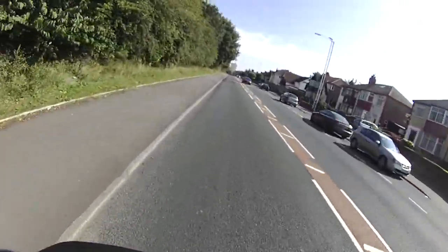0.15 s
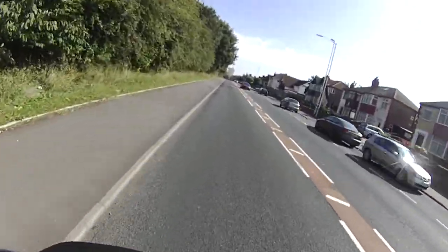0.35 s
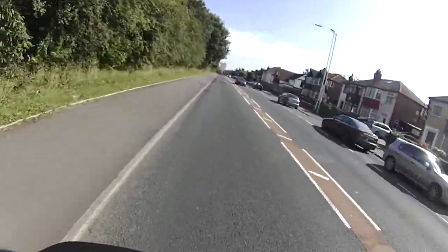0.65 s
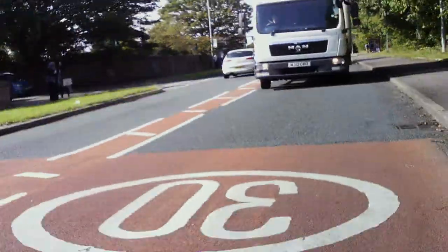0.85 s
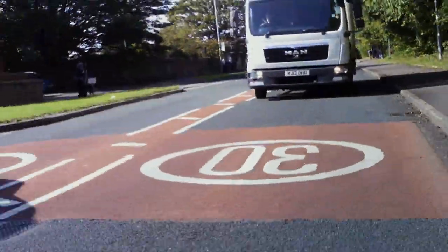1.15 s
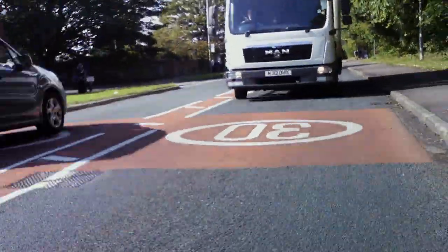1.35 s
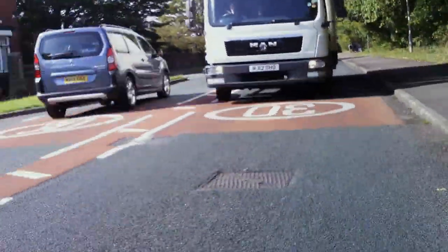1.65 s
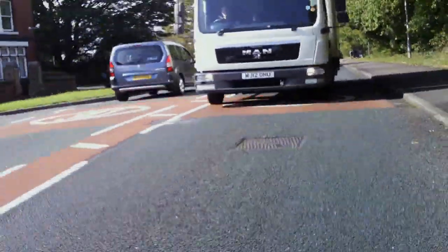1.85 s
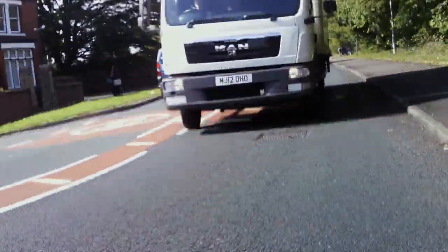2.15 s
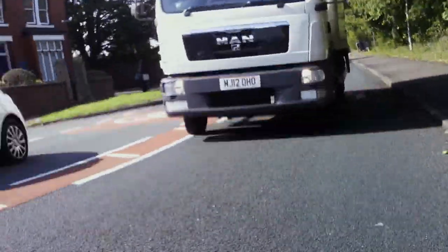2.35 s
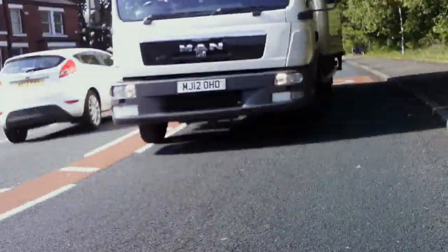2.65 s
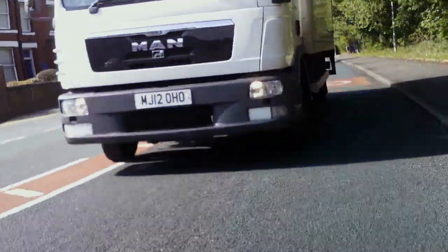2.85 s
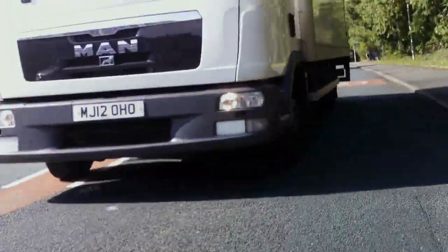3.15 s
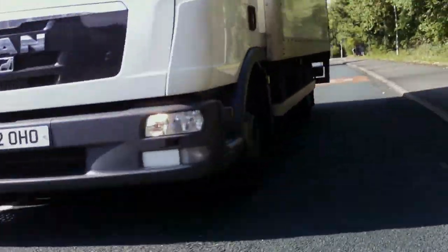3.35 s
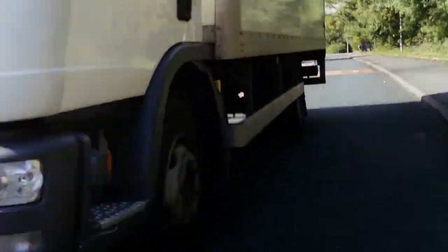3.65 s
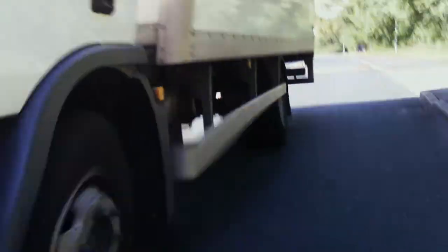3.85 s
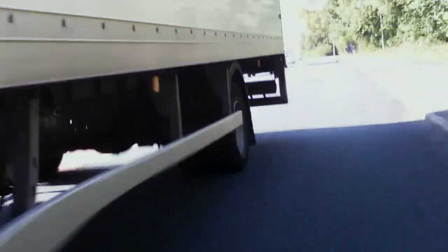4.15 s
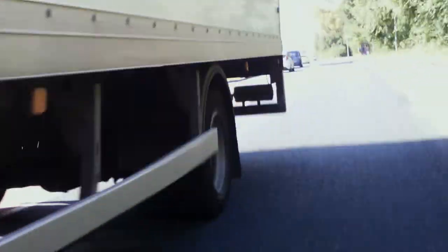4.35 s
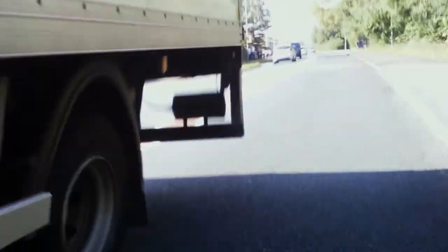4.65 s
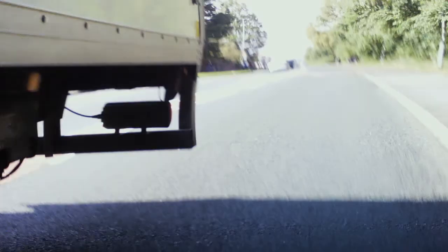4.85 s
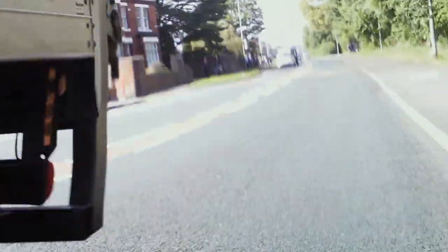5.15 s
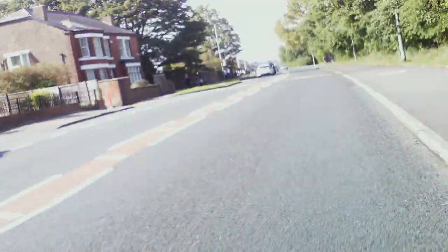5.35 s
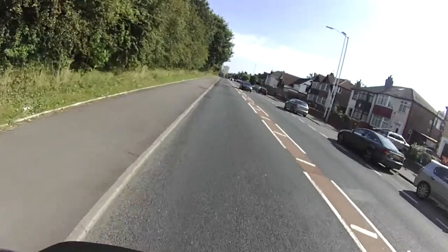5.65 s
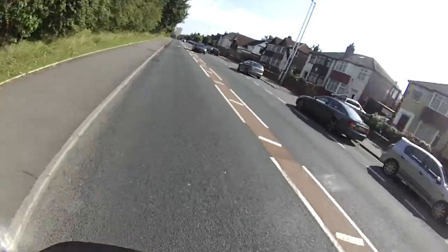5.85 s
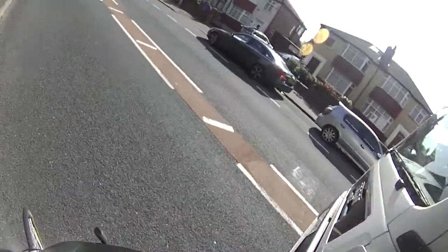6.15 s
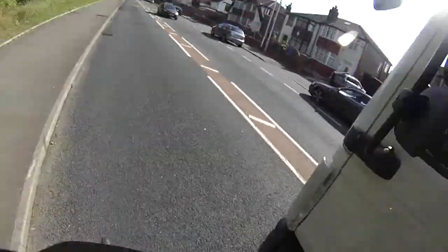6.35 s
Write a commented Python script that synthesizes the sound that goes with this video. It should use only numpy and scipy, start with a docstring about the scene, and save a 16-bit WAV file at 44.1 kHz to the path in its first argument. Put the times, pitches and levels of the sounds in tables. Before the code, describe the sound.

Outdoor road sound, the same in both channels. It opens with a faint even rush and low hum, then jumps to heavy wind overloading a close microphone, gusting and knocking, with dry rattles. As a truck passes very near, a brief diesel growl swells, cracks multiply and a bright hiss climbs. A harsh high air horn blasts twice with almost no gap, stops abruptly, and gentle road rush grows at the end.

```python
"""Even road rush over a low engine drone at a cyclist's helmet, then gusty wind overloading a rear camera.
A box truck overtakes behind the cyclist with a growl and a rising hiss amid sharp cracks and rattles, and a
shrill air horn blasts twice before the helmet view returns. Shaped noise makes wind, tyres and hiss; damped
modes make low thumps and ticks; summed harmonics make the horn, and a soft ceiling overloads the rear input."""
import sys
import numpy as np
from scipy import signal
from scipy.fft import rfft, irfft, next_fast_len
from scipy.io import wavfile
from scipy.ndimage import uniform_filter1d, map_coordinates

SR = 44100
rng = np.random.default_rng(int(sys.argv[2]) if len(sys.argv) > 2 else 0)


def to_wav(s):
    """Save 16-bit WAV."""
    ch = np.atleast_2d(s).T  # columns
    pcm = np.round(np.clip(ch, -1, 1) * 32767)  # PCM
    wavfile.write(sys.argv[1], SR, pcm.astype(np.int16))


N = 286209
TIME = np.arange(N) / SR  # seconds


def amp(db):
    """Logarithmic level: decibels to an amplitude ratio."""
    return 10 ** (np.asarray(db) / 20)


def unit(x):
    """Normalisation by mean power: scale to rms 1."""
    return x / np.sqrt(np.mean(x ** 2) + 1e-20)


def curves(rows):
    """Linear interpolation: one value per sample for each column after the time."""
    knot_s, *columns = np.transpose(rows)
    return [np.interp(TIME, knot_s, column) for column in columns]


def wobble(rate):
    """Band-limited random modulation: a smooth curve through `rate` random knots per second."""
    knots = rng.standard_normal(int(N * rate / SR) + 4)
    return map_coordinates(knots, [TIME * rate])


def swells(rows):
    """Gaussian envelopes: bell-shaped swells from (centre_s, half_width_s, height) rows."""
    return sum(height * np.exp(-((TIME - s) / width) ** 2) for s, width, height in rows)


def level_swells(rows):
    """Gaussian envelopes whose heights are given in decibels."""
    return swells([(s, width, amp(db)) for s, width, db in rows])


def between(start, end):
    """Gating: 1 from start to end, with millisecond edges."""
    return np.clip(np.minimum(TIME - start, end - TIME) * 1000, 0, 1)


def filtered(x, response):
    """Linear filtering: multiply the spectrum by a response of frequency."""
    m = next_fast_len(N + 8192)
    return irfft(rfft(x, m) * response(np.fft.rfftfreq(m, 1 / SR)), m)[..., :N]


def noise(spectrum):
    """Spectral shaping: random noise of rms 1 coloured by (frequency_hz, density_db) points."""
    f, db = np.transpose(spectrum)

    def colour(hz):
        return amp(np.interp(np.log(hz + 1), np.log(f), db))

    return unit(filtered(rng.standard_normal(N), colour))


def steady(x, seconds):
    """Envelope normalisation: divide out the slow swells of a sound."""
    window = signal.windows.hann(int(seconds * SR) + 3)
    power = signal.fftconvolve(x ** 2, window / window.sum(), "same")
    return x / np.sqrt(np.abs(power) + 1e-6)


def patchy(x, depth_db):
    """Independent band modulation: neighbouring bands of a noise swell and fade on their own."""
    z = signal.stft(x, nperseg=512)[2]
    across_bands = uniform_filter1d(rng.standard_normal(z.shape), size=9, axis=0)
    field = uniform_filter1d(across_bands, size=30, axis=1)
    return unit(signal.istft(z * amp(depth_db * unit(field)), nperseg=512)[1][:N])


def ring(modes, age, rise_s):
    """Modal decay: damped (frequency_hz, level_db, t60_s) modes after an impulse with a rounded start."""
    tones = sum(amp(db - 60 * age / t60) * np.sin(2 * np.pi * hz * age) for hz, db, t60 in modes)
    return tones * (1 - np.exp(-(age / rise_s) ** 2))


def self_noise():
    """Electronic noise floor: a faint, stationary coloured hiss."""
    return amp(-67.5) * noise([(1000, 9.5), (3000, 5.5), (7000, 0.0), (10000, 4.0), (15500, -14)])


# spectra of the low roar and of the tyre and air rush: frequency_hz, density_db (relative)
ROAR_SPECTRUM = [(20, -16), (45, -7), (100, -5), (170, -4), (300, 0), (450, -7.5), (700, -10), (1100, -9.5),
                 (2500, -55)]
TYRE_SPECTRUM = [(300, 1.5), (750, 2), (1100, 0), (1800, 2.5), (2350, -2.5), (2800, -9), (3300, -24.5),
                 (4900, -27), (5750, -21.5), (6700, -32.5), (10000, -39.5), (14000, -42), (15500, -76)]
# engine harmonics: order, level_db (before the engine gain)
DRONE_HARMONICS = [(1, -58.5), (2, -57), (3, -63.5), (4, -61)]
# engine loudness: time_s, gain_db
ENGINE_GAIN = [(0, -1.5), (0.78, 2.5), (6.2, 1.5), (6.49, 1.5)]
# road rush before and after the rear view: time_s, roar_db, rush_db (before the trims)
ROAD_BEFORE = [(0.02, -41.5, -47), (0.21, -48.5, -49.5), (0.36, -44.5, -47), (0.43, -42, -45.5),
               (0.6, -49, -45), (0.75, -65, -45)]
ROAD_AFTER = [(5.54, -52, -45.5), (5.7, -54, -46.5), (5.85, -52, -47), (6.02, -48, -48.5),
              (6.16, -45, -45), (6.24, -60, -43), (6.42, -38.5, -40.5), (6.48, -42.5, -44)]
DRONE_HZ = 35.7  # mean pitch of the first order


def road(roar_gain_db=-1, rush_gain_db=0.86):
    """Broadband tyre and flow noise rushes past the helmet over the harmonic drone of an engine."""
    roar_db, rush_db = curves(np.vstack([ROAD_BEFORE, ROAD_AFTER]))
    engine_db, = curves(ENGINE_GAIN)
    roar = amp(roar_db + roar_gain_db + 0.29 * wobble(33)) * noise(ROAR_SPECTRUM)
    rush_level = amp(rush_db + rush_gain_db + 0.81 * wobble(30))
    rush = rush_level * patchy(noise(TYRE_SPECTRUM), depth_db=1.47)
    turn = 2 * np.pi * np.cumsum(DRONE_HZ * (1 + 0.014 * wobble(3.3))) / SR
    drone = np.zeros(N)
    for order, (_, db) in enumerate(DRONE_HARMONICS, 1):
        drone += amp(db + 2.3 * wobble(3.18)) * np.sqrt(2) * np.sin(order * turn)
    return roar + rush + amp(engine_db) * drone


# the truck's hiss reaching the helmet: centre_s, half_width_s, level_db
NEARING_SWELLS = [(6.26, 0.05, -80), (6.41, 0.055, -65.5)]


def nearing():
    """Addition of noise bands: the truck brightens the road rush as it comes up beside the helmet."""
    hiss = noise([(1500, -10), (3500, 3), (5000, -6.5), (7500, -4), (10000, -26), (15000, -28)])
    return level_swells(NEARING_SWELLS) * hiss


# steady strength of the wind at the rear microphone: time_s, level_db (before unrest and trims)
WIND_LEVEL = [(0.8, -31.5), (1.1, -28.5), (1.6, -29.5), (1.95, -26.5), (2.75, -28), (3.3, -28.5),
              (3.5, -31.5), (3.9, -29), (4.1, -28.5), (5.47, -26)]
# gusts and lulls: centre_s, half_width_s, change_db
GUST_SWELLS = [(0.87, 0.013, 1.5), (0.995, 0.031, 10), (1.125, 0.024, -4), (1.354, 0.017, 6),
               (1.64, 0.016, -7), (1.82, 0.043, 3.5), (1.915, 0.016, -2), (2.1, 0.021, 5), (2.36, 0.012, 5),
               (2.53, 0.029, 3), (2.735, 0.017, 2.5), (2.806, 0.032, 7.5), (2.945, 0.0051, -18),
               (3.036, 0.015, 4.5), (3.105, 0.024, -3.5), (3.225, 0.033, 4.5), (4.47, 0.018, 6.5),
               (4.75, 0.035, 6.5), (4.83, 0.019, -2), (4.895, 0.021, 10), (4.98, 0.011, 9.5),
               (5.035, 0.026, 13), (5.12, 0.04, 0), (5.262, 0.03, 13)]
# spectra of the buffeting, the slipstream and the deepest buffeting: frequency_hz, density_db (relative)
BUFFET_SPECTRUM = [(45, -23), (62, -14), (92, -2.5), (118, -9), (142, -2), (164, -2), (194, -2.5),
                   (222, -12.5), (380, -18), (640, -30), (1000, -44.5), (2000, -62), (4000, -87)]
SLIPSTREAM_SPECTRUM = [(120, -3), (280, 2), (390, 1), (520, -7), (635, -1), (700, -9), (770, -7.5),
                       (1000, -30), (1550, -26), (2100, -40), (4000, -42.5)]
SUB_SPECTRUM = [(12, -23), (22, -18), (31, -3.5), (40, -13), (62, -31), (120, -49.5), (400, -100)]
# deepest buffeting: time_s, level_db
SUB_LEVEL_DB = [(0.8, -35.5), (1.0, -25), (1.12, -37.5), (1.42, -28.5), (1.53, -45.5), (1.8, -27.5),
                (2.25, -29.5), (2.6, -27.5), (2.82, -20.5), (2.94, -40), (3.23, -24), (3.45, -37.5),
                (3.68, -40), (3.9, -34), (4.12, -29), (4.8, -31.5), (4.92, -20), (5.47, -30.5)]
UNREST_DB, UNREST_RATE = 1.46, 23  # random swings of the wind (dB, knots per second)


def wind(slip_db=-40.5, follow=0.56, flutter_db=2, roar_grows=0.8, buffet_db=-2):
    """Turbulent pressure: eddies buffet the housing under a more even slipstream roar; gusts lift both."""
    wind_db = curves(WIND_LEVEL)[0] + UNREST_DB * wobble(UNREST_RATE)
    gust_db = swells(GUST_SWELLS)
    buffets = amp(wind_db + gust_db + buffet_db) * steady(noise(BUFFET_SPECTRUM), seconds=0.11)
    # the roar follows the wind by fewer decibels than the buffets do
    roar_db = slip_db + follow * (wind_db - np.mean(wind_db)) + roar_grows * gust_db
    roar = amp(roar_db + flutter_db * wobble(90)) * noise(SLIPSTREAM_SPECTRUM)
    sub = amp(curves(SUB_LEVEL_DB)[0]) * steady(noise(SUB_SPECTRUM), seconds=0.19)
    return buffets + roar + sub


# drone of air around the rear camera: time_s, pitch_hz, level_db (before trim and swing)
HOLLOW_DRONE = [(0.85, 181.1, -30.5), (1.05, 165.3, -37.5), (1.25, 180.3, -33), (1.36, 157.4, -30.5),
                (1.55, 174.3, -33.5), (1.64, 152, -42), (1.78, 180.1, -30), (1.92, 165, -42),
                (2.04, 141.7, -31), (2.28, 182, -32.5), (2.36, 147.6, -26.5), (2.52, 190.1, -34),
                (2.82, 156.3, -27), (2.93, 179.6, -31), (3.1, 170, -37.5), (3.24, 147.9, -33.5),
                (3.34, 172, -24.5), (3.45, 165.3, -42), (3.6, 168.2, -35.5), (3.8, 168, -30.5),
                (3.9, 181.9, -37.5), (4.07, 168, -28.5), (4.25, 165, -45), (4.47, 155.5, -31),
                (4.6, 174.6, -36.5), (5.47, 160, -34.5)]


def hollow(gain_db=-1):
    """Flow-excited tone: air around the housing drones unsteadily, its pitch wandering with time."""
    pitch_hz, level_db = curves(HOLLOW_DRONE)
    turn = 2 * np.pi * np.cumsum(pitch_hz) / SR + .55 * wobble(55)
    swing_db = 3.2 * wobble(40)
    return amp(level_db + gain_db + swing_db) * np.sqrt(2) * np.sin(turn)


# sharp steps: start_s, step_height (full scale 1, before overload)
CLICK_STEPS = [(0.786, -0.035), (0.796, -0.08)]


def clicks(relax=0.003):
    """Exponential relaxation: two sharp steps decay at once (time constant in s)."""
    return sum(height * (TIME >= s) * np.exp(-np.abs(TIME - s) / relax) for s, height in CLICK_STEPS)


# faint, brief bands of high hiss: centre_s, half_width_s, level_db
HIGH_HISS_SWELLS = [(2.63, 0.029, -64), (2.796, 0.0028, -45.5), (3.295, .01, -61)]


def high_hiss():
    """Band-limited noise under Gaussian envelopes: faint, brief bands of high hiss."""
    band = noise([(5000, -40), (8500, -9), (9800, -4), (10800, -11), (14000, -16), (16000, -30)])
    return level_swells(HIGH_HISS_SWELLS) * band


# sharp low thumps, mostly within wind gusts: start_s, strength_db (before the modes ring)
LOW_THUMPS = [(0.947, -3.5), (0.96, 3), (0.977, 2.5), (0.992, 3.5), (1.004, 4), (1.010, 8), (1.024, -12.5),
              (1.349, -14), (2.729, -11), (2.745, -10), (2.776, -10), (2.790, -3), (2.797, 1),
              (2.806, -4.5), (2.823, -2), (3.249, -12), (5.016, 2), (5.035, -4), (5.043, -2), (5.050, 0),
              (5.252, -1), (5.266, -7), (5.287, -3)]
# modes of a thump: frequency_hz, level_db (relative), t60_s
THUMP_MODES = [(152.5, -0.5, 0.015), (356, 1.5, 0.01), (559, -9.5, 0.0057)]
THUMP_RISE_S = 0.0012  # rounds the start of a thump


def low_thumps():
    """Impulse response: each sharp low thump rings briefly in damped modes."""
    impulses = np.zeros(N)
    for s, db in LOW_THUMPS:
        impulses[round(s * SR)] = amp(db)
    return signal.fftconvolve(impulses, ring(THUMP_MODES, TIME[:SR // 8], THUMP_RISE_S))[:N]


# sharp cracks and rattles: start_s, strength_db (before the ticks and the clatter are shaped)
CRACK_IMPULSES = [(0.949, -32), (0.962, -34), (0.979, -28), (0.992, -24), (0.995, -32), (1.0, -33),
                  (1.005, -25), (1.008, -32), (1.01, -28), (1.337, -36), (1.351, -30), (1.358, -37),
                  (1.956, -28), (1.970, -34), (2.011, -34.5), (2.067, -35), (2.100, -32), (2.107, -29.5),
                  (2.178, -32), (2.341, -34), (2.358, -39), (2.484, -38), (2.513, -32), (2.730, -33),
                  (2.745, -31), (2.776, -39), (2.791, -40), (2.798, -33), (2.807, -41), (2.822, -44),
                  (2.878, -34), (3.032, -36), (3.165, -35), (3.234, -35), (3.250, -29), (3.668, -39),
                  (3.938, -26), (4.047, -25.5), (4.068, -22), (4.133, -36), (4.185, -32), (4.202, -28),
                  (4.214, -36), (4.260, -33), (4.286, -30), (4.323, -23), (4.331, -29), (4.440, -21),
                  (4.479, -32), (4.509, -23), (4.562, -31), (4.595, -25), (4.659, -22)]
# spectrum of the short clatter: frequency_hz, density_db (relative)
RATTLE_SPECTRUM = [(300, -4), (700, 7.5), (1200, 6.5), (1900, -11.5), (2700, -10), (4000, -22), (8000, -29),
                   (15000, -37.5)]
# modes of the dry tick: frequency_hz, level_db (relative), t60_s
TICK_MODES = [(830, 2.5, 0.0083), (1500, 0, 0.0043), (2600, -5.5, 0.0032), (4300, -10.5, 0.0022)]
CHATTER_RATE = 130  # mean number of small random ticks per second
CHATTER_DB, CHATTER_SPREAD_DB = -46.5, 6  # their usual strength and the scale of its scatter
CHATTER_FOLLOW = 0.65  # dB of chatter per dB of wind: both grow with speed
TICK_RISE_S = 0.00033  # a tick builds up almost at once


def rattles(decay=0.012, rise=0.00066, shake_db=-16, crack_db=-2, flutter_db=4.5, scatter=0.12):
    """Impulse excitation: set and random impulses each give a dry modal tick and a short, uneven clatter."""
    wind_db, = curves(WIND_LEVEL)
    chatter_db = CHATTER_DB + CHATTER_FOLLOW * (wind_db - np.mean(wind_db))
    strength = amp(chatter_db + CHATTER_SPREAD_DB * rng.uniform(-0.68, 1, N))
    impulses = (rng.random(N) < CHATTER_RATE / SR) * strength
    for s, db in CRACK_IMPULSES:
        impulses[round(s * SR)] = amp(db)
    age = TIME[:SR // 4]
    # the clatter falls 20 dB in each decay time (s)
    envelope = amp(shake_db - 20 * age / decay) * (1 - np.exp(-age / rise))
    shake = signal.fftconvolve(impulses, envelope)[:N]
    shake = shake * amp(flutter_db * np.minimum(wobble(450), 1)) * noise(RATTLE_SPECTRUM)
    ticks, brief = np.zeros(N + SR), TIME[:SR // 50]
    stretch = np.exp(scatter * rng.standard_normal(N))  # scatters the pitch and decay of each tick
    for i in np.flatnonzero(impulses):
        ticks[i:i + len(brief)] += impulses[i] * ring(TICK_MODES, brief * stretch[i], TICK_RISE_S)
    return shake + amp(crack_db) * ticks[:N]


# bursts as the truck draws level: centre_s, half_width_s, level_db
CLATTER_SWELLS = [(4.185, 0.011, -40.5), (4.211, 0.011, -37.5), (4.257, 0.021, -37), (4.287, 0.0086, -34),
                  (4.33, 0.008, -31.5), (4.39, 0.037, -48.5), (4.5, 0.077, -47), (4.563, 0.0093, -40),
                  (4.603, 0.017, -40), (4.66, 0.018, -39.5)]
# spectrum of the clatter: frequency_hz, density_db (relative)
CLATTER_SPECTRUM = [(250, -1.5), (600, 6.5), (1200, 2), (1900, -3), (2700, -11.5), (4000, -21),
                    (8000, -26.5), (15000, -40)]


def clatter(rough_db=8, rough_rate=450):
    """Amplitude roughness: a dense crackle comes in bursts while the truck is alongside."""
    roughness = amp(rough_db * np.minimum(wobble(rough_rate), 1))
    return level_swells(CLATTER_SWELLS) * unit(roughness * noise(CLATTER_SPECTRUM))


# the truck's hiss as it draws level: time_s, level_db (before its random swings)
TRUCK_LEVEL = [(2.5, -94), (3.0, -73.5), (3.5, -62.5), (3.999, -58), (4.3, -56), (4.699, -49.5)]
# upward sweep of the hiss: time_s, stretch (ratio of frequencies)
HISS_SWEEP = [(3.3, .8), (3.7, .87), (4.2, .95), (4.7, 1.03)]
# spectrum of the hiss before stretching: frequency_hz, density_db (relative)
HISS_SPECTRUM = [(1000, 9.5), (2500, 2.5), (4000, -6), (5500, -0.5), (6800, -6.5), (8300, -5),
                 (10600, -0.5), (12800, -3.5), (14300, -12), (20000, -26)]


def truck():
    """Time-varying filtering: the truck's hiss swells and sweeps upward as its wheels draw level."""
    hiss_db, = curves(TRUCK_LEVEL)
    hz, t, z = signal.stft(rng.standard_normal(N), SR, nperseg=512)
    stretch = np.interp(t, *np.transpose(HISS_SWEEP))
    colour = amp(np.interp(hz[:, None] / stretch, *np.transpose(HISS_SPECTRUM)))
    hiss = unit(signal.istft(z * colour, nperseg=512)[1][:N])
    return amp(hiss_db + 0.68 * wobble(10.0)) * hiss


# the truck's engine going by: centre_s, half_width_s, level_db
DIESEL_SWELLS = [(4.19, 0.14, -37.5)]
# spectrum of the growl: frequency_hz, density_db (relative)
DIESEL_SPECTRUM = [(150, -22), (250, -1), (355, 4.5), (450, -8), (640, -4.5), (900, -18), (2000, -31),
                   (4000, -60)]
FIRING_HZ = 67


def diesel(throb=0.45):
    """Amplitude modulation: the growl throbs at the firing rate and swells as the cab goes by."""
    turn = 2 * np.pi * FIRING_HZ * TIME + 0.4 * wobble(12)
    growl = unit((1 + throb * np.sin(turn)) * noise(DIESEL_SPECTRUM))
    return level_swells(DIESEL_SWELLS) * growl


# horn blasts: start_s, end_s, level_db (at the start, before sag), overshoot_hz
HORN_BLASTS = [(4.706, 5.056, -20.5, 38.4), (5.056, 5.476, -18.5, 8.8)]
HORN_HZ, RISE_HZ_PER_S = 789.5, 6.5  # settled pitch at the first blast, and its slow climb
SETTLE_S = 0.01  # time constant of the pitch overshoot
ATTACK_S, SAG_DB_PER_S = 0.004, 7  # the valve opens, then the pressure sags


def blowing():
    """Supply pressure governs pitch and strength: each blast starts sharp, settles and slowly sags."""
    pitch_hz = HORN_HZ + RISE_HZ_PER_S * (TIME - HORN_BLASTS[0][0])
    pressure = np.zeros(N)
    for start, end, db, overshoot_hz in HORN_BLASTS:
        age, gate = np.maximum(TIME - start, 0), between(start, end)
        pitch_hz += gate * overshoot_hz * np.exp(-age / SETTLE_S)
        pressure += gate * amp(db - SAG_DB_PER_S * age) * (1 - np.exp(-age / ATTACK_S))
    return pitch_hz, pressure


# harmonics of the horn: multiple, level_db (relative)
HORN_HARMONICS = [(1, -8.5), (2, 1), (3, -5.5), (4, -3), (5, -6.5), (6, -10), (7, -12), (8, -11), (9, -13),
                  (10, -8.5), (11, -3.5), (12, 1.5), (13, -3), (14, -8.5), (15, -8.5), (16, -13.5),
                  (17, -16.5), (18, -16), (19, -18)]
# swells of harmonics 2, 3 and 4: time_s, level_db (only the departure from the mean is heard)
SECOND_LEVEL = [(4.72, -33), (4.835, -29.5), (4.9, -34), (4.96, -30.5), (5.03, -29.5), (5.07, -42.5),
                (5.115, -30), (5.205, -36.5), (5.27, -32), (5.335, -26), (5.44, -27), (5.47, -29.5)]
THIRD_LEVEL = [(4.715, -29.5), (4.735, -40), (4.797, -42), (4.82, -38), (4.89, -38), (4.93, -33.5),
               (5.03, -44), (5.08, -37.5), (5.33, -35), (5.352, -46), (5.385, -29), (5.43, -33),
               (5.47, -50)]
FOURTH_LEVEL = [(4.72, -38), (4.99, -36), (5.04, -40), (5.08, -38.5), (5.185, -33), (5.24, -41),
                (5.3, -36.5), (5.365, -41), (5.44, -29), (5.47, -37.5)]
# spectrum of the air escaping through the horn: frequency_hz, density_db (relative)
AIR_SPECTRUM = [(500, -1), (850, 9), (1100, -3), (1600, -6.5), (2800, -5.5), (4000, -10), (6000, -1),
                (10000, -5), (15000, -12)]
ECHO_SHIFT_HZ = 12  # the truck's motion raises the fundamental of the roadside reflection


def horn(swing=1.0, air_db=-15, echo_db=-16):
    """Interference: a diaphragm chops air; reflections make harmonics fade, and return slightly sharp."""
    pitch_hz, pressure = blowing()
    lift_db = {}
    for k, rows in enumerate([SECOND_LEVEL, THIRD_LEVEL, FOURTH_LEVEL], 2):
        lift_db[k] = swing * (curves(rows)[0] - np.mean(rows, axis=0)[1])
    # the diaphragm's timing trembles
    turn = 2 * np.pi * np.cumsum(pitch_hz) / SR + .036 * wobble(200)
    echo_turn = turn + 2 * np.pi * ECHO_SHIFT_HZ * TIME
    tone = np.zeros(N)
    for k, (_, db) in enumerate(HORN_HARMONICS, 1):
        depth_db = .7 if k in lift_db else 3
        fading = amp(depth_db * wobble(24)) * (1 + .16 * wobble(130))
        direct = np.sin(k * turn + 0.32 * wobble(14) + rng.uniform(0, 2 * np.pi))
        echo = amp(echo_db) * np.sin(k * echo_turn + 2 * wobble(18))
        tone += fading * amp(db + lift_db.get(k, 0)) * (direct + echo)
    return pressure * (steady(tone, seconds=0.032) + amp(air_db) * noise(AIR_SPECTRUM))


def overload(x, hardness=12):
    """Saturation: the rear camera's input flattens everything above its ceiling."""
    ceiling = .112  # of full scale
    fine = signal.resample_poly(x, 2, 1)  # oversampling limits aliasing
    flattened = fine / (1 + np.abs(fine / ceiling) ** hardness) ** (1 / hardness)
    return signal.resample_poly(flattened, 1, 2)


REAR_ON, REAR_OFF, HELMET_BACK = 0.777, 5.477, 5.511  # camera changes (s)


def scene():
    """Superposition and gating: helmet, overloaded rear camera, then helmet again; both channels equal."""
    air = wind() + hollow() + high_hiss()
    passing = truck() + diesel() + clatter()
    rear = overload(air + passing + low_thumps() + clicks() + horn()) + rattles()
    away = between(REAR_ON, HELMET_BACK)
    helmet = road() + nearing()
    mono = helmet * (1 - away) + rear * between(REAR_ON, REAR_OFF) + self_noise() * away
    return np.array([mono, mono])


TOP_HZ = 15800  # band limit


def record(dry):
    """Low-pass filtering: a steep roll-off at the band limit."""
    return filtered(dry, lambda hz: np.clip((TOP_HZ + 60 - hz) / 200, 0, 1) ** 2)


dry = scene()
out = record(dry)
to_wav(out)
```